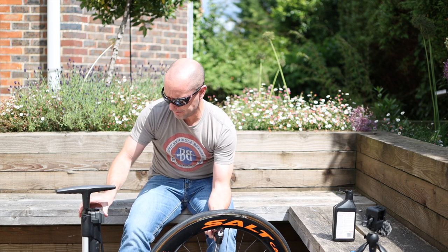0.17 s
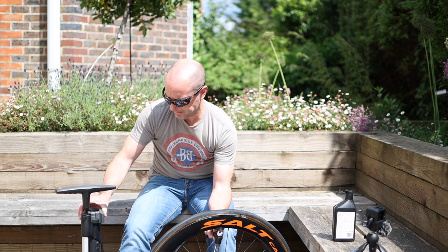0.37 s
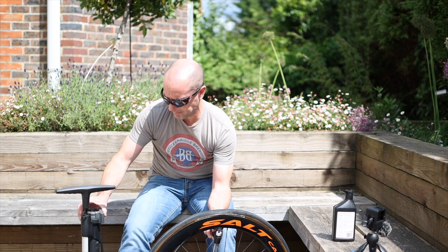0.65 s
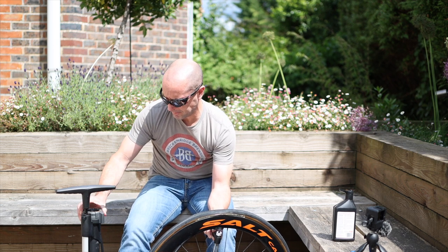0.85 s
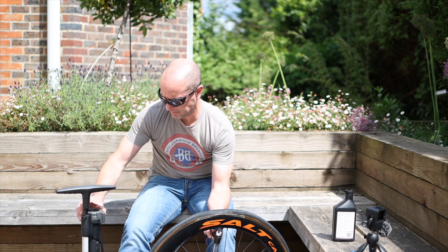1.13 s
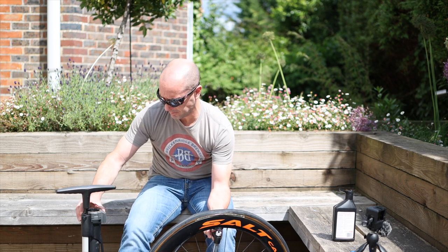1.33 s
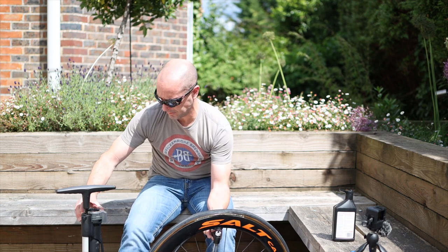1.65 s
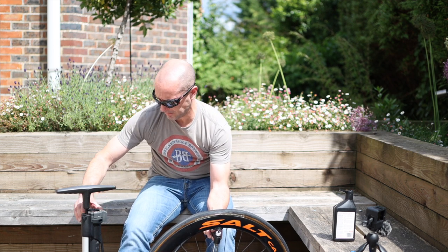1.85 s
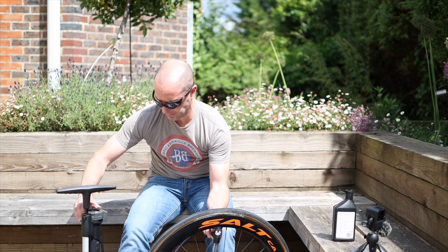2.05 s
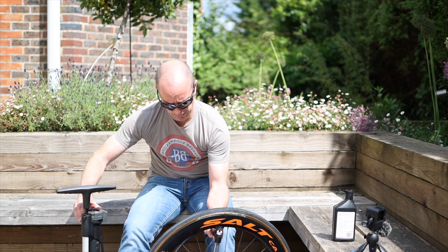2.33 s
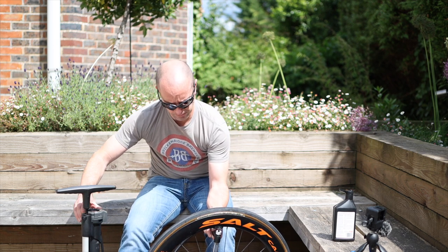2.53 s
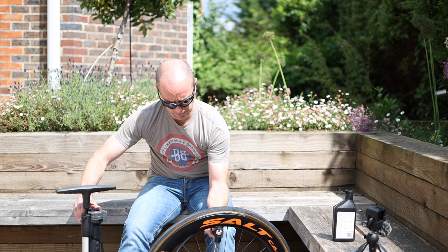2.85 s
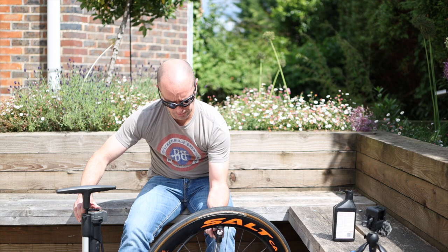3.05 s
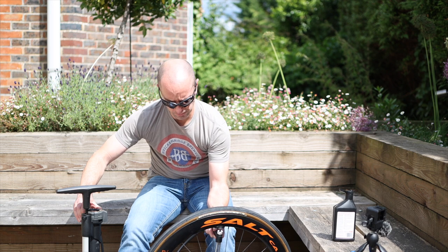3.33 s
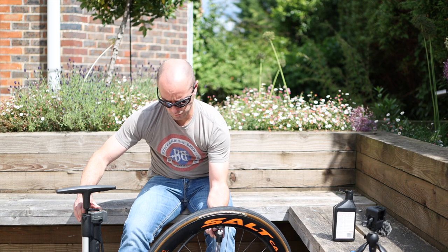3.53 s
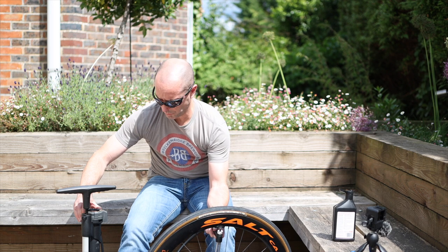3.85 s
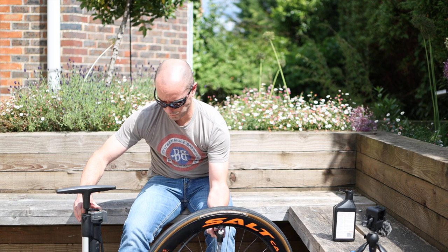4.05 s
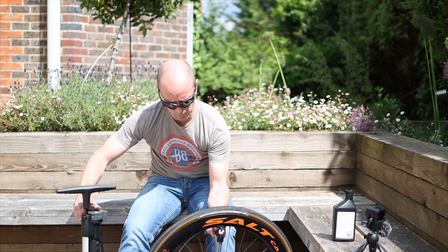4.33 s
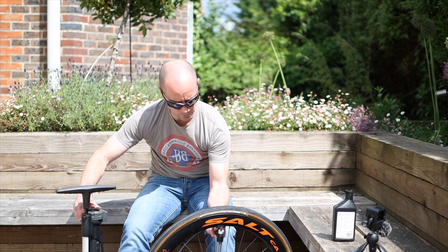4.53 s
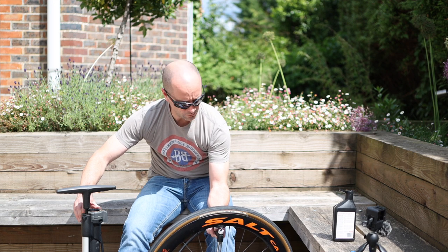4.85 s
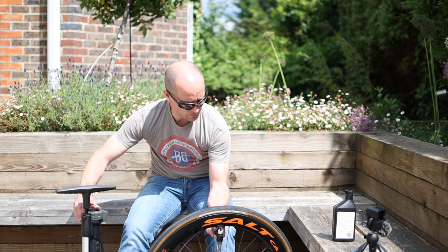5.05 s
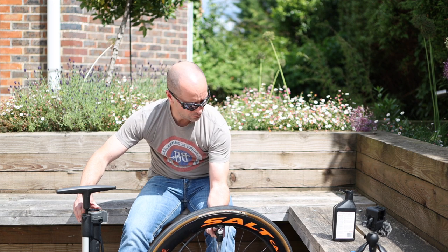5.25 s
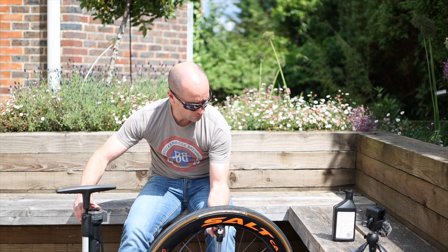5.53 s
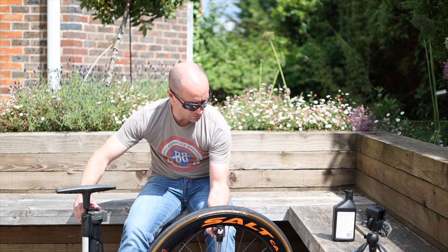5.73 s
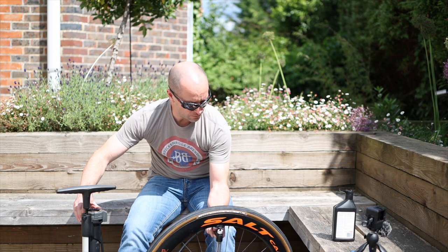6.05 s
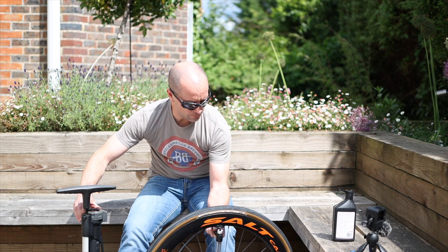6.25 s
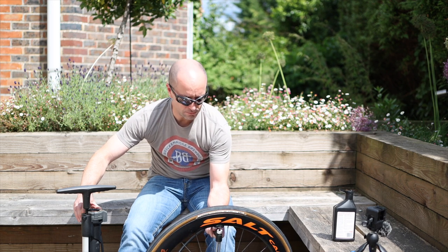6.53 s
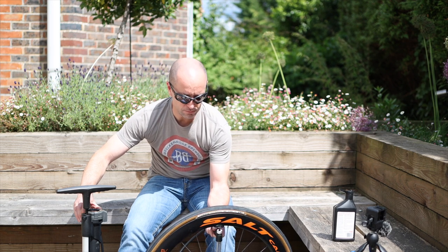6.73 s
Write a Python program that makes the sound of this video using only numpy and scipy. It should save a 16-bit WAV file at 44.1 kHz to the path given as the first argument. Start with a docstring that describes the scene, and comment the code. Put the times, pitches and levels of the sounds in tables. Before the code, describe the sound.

Very faint garden air runs throughout, in mono. From 0 to 1.8 seconds a stiff floor-pump lever sticks and slips: uneven small clicks, faint creaking steps, short hollow barrel rings and dull body thuds, with a tiny air spit near 1.4. Around 1.93 to 2.0 the valve knocks open and air bursts out, surging at 2.1, then gradually weakening. Soft hose bumps accompany it, and thin, flickering whistles catch and let go, sliding downward until about 3.8. At 3.6 an extremely loud, clipped crack marks the tyre bead snapping onto the rim; another follows at 4.1. The jet dies by 4.8, leaving a fine, steady hiss. Two heavier bangs hit almost together at 5.45 and 5.52, with ringing spokes and a short yard echo. The hiss drops slightly, and a final sharp pop strikes at 6.8, ringing briefly.

```python
"""A stiff lever creaks and ticks first: a charged floor pump on a wooden garden deck, quiet air around it.
Each slip of the lever is coloured impact noise with a short barrel ring; the valve then knocks open.
Air rushes down the hose as shaped noise, with whistles, sine edge tones, that sink with the air speed.
The tubeless bicycle tyre's bead snaps onto the rim in five loud noise bursts, each with ringing spokes
and an echo of the yard. One channel, through a limiter, a clip and two band limits."""
import sys
import numpy as np
from scipy import signal
from scipy.fft import rfft, irfft
from scipy.io import wavfile
from scipy.ndimage import uniform_filter1d, minimum_filter1d

SR = 44100
rng = np.random.default_rng(int(sys.argv[2]) if len(sys.argv) > 2 else 0)


def pcm_store(signal):
    """Save signal as 16-bit PCM."""
    levels = np.round(np.clip(np.atleast_2d(signal), -1, 1) * 32767)
    wavfile.write(sys.argv[1], SR, levels.astype(np.int16).T)


N = 303849
TIME = np.arange(N) / SR

# Still garden air, before scaling: [hz, level_db_per_hz]
GARDEN_AIR = [(20, -14.5), (50, -3), (100, -3), (250, -1.5), (500, 1), (1200, -7), (2000, -17.5),
              (3500, -16.5), (6000, -21.5), (10000, -26.5), (16000, -27)]

# Clear slips of the stiff lever: [start_s, tick_db, body_thud_db]
LEVER_SLIPS = [(0.046, -41.5, -46), (0.074, -41, -43.5), (0.139, -45.5, -46.5), (0.198, -47.5, -50.5),
               (0.283, -43.5, -47.5), (0.305, -42, -44.5), (0.366, -40, -44), (0.392, -38.5, -41.5),
               (0.443, -44, -45), (0.498, -35.5, -42.5), (0.548, -46, -42), (0.617, -43.5, -44.5),
               (0.667, -39.5, -42.5), (0.735, -41.5, -44.5), (0.784, -39, -44), (0.854, -44, -43.5),
               (0.94, -45.5, -50), (0.991, -45, -46.5), (1.106, -39, -46), (1.178, -49.5, -46.5),
               (1.272, -43, -46.5), (1.313, -39.5, -44.5), (1.375, -49, -45), (1.404, -39, -43.5),
               (1.493, -41, -48), (1.52, -43, -50.5), (1.603, -35.5, -42.5), (1.658, -44, -46),
               (1.765, -41.5, -44.5)]
# Colour of the lever's tick, before scaling: [hz, level_db_per_hz]
TICK_COLOUR = [(200, 3.5), (500, 1), (1000, 5), (1650, -5.5), (2050, -8.5), (2500, -8), (3400, -8.5),
               (4500, -19), (8000, -34.5), (16000, -42)]
# Colour of the pump body, before scaling: [hz, level_db_per_hz]
BODY_COLOUR = [(40, -30.5), (130, -24.5), (195, 1.5), (275, 4.5), (350, -11.5), (440, -8), (530, -9),
               (700, -15.5), (1100, -23.5), (2000, -41), (5000, -68)]
# Short ring of the pump barrel after each slip, relative levels: [pitch_hz, level_db, t60_s]
BARREL_MODES = [(526, -2.5, 0.11), (792, 3, 0.072), (1012, -2, 0.104), (1277, -11.5, 0.044),
                (2040, -4.5, 0.056)]
# The lever creaks on in dull thuds of the pump body: [start_s, level_db]
LATER_CREAKS = [(1.965, -43.5), (2.044, -41.5), (2.1, -35.5), (2.159, -44), (2.228, -42), (2.315, -42),
                (2.384, -43.5), (2.533, -48.5), (3.386, -43.5), (3.462, -47), (3.502, -37.5), (3.958, -41.5)]
# The valve knocks open: [start_s, level_db, pitch_hz]
VALVE_KNOCKS = [(1.9288, -33, 960), (2.0000, -35, 810), (2.0045, -32.5, 520)]
# Between clear slips the lever creeps on in small, uneven steps; jitter and spread are standard deviations
CREEP_STEP_S, CREEP_JITTER_S = 0.051, 0.0086
CREEP_TICK_DB, CREEP_THUD_DB, CREEP_SPREAD_DB = -53, -50, 2

# Small leaks of air; a peak before the start only fades, an end before the start is silent:
# [start_s, peak_s, end_s, level_db, centre_hz]
AIR_LEAKS = [(0.295, 0.292, 0.39, -65, 4700), (1.362, 1.385, 1.414, -44, 4900), (1.6, 1.23, 3.8, -77, 4700),
             (3.8, 4.09, 4.11, -52.5, 7200), (5.7, 4.6, 4.1, -59, 11000)]
# Hiss of the fast jet, before scaling: [hz, level_db_per_hz]
JET_COLOUR = [(100, -12.5), (600, -9), (1800, -1.5), (2400, 0.5), (3100, -4.5), (3600, -1.5), (4800, -3),
              (6400, -3.5), (8100, -6), (9100, -11), (12200, -11.5), (15700, -13)]
# Hiss of the last trickle, before scaling: [hz, level_db_per_hz]
TRICKLE_COLOUR = [(100, -6), (600, 0), (1800, -6), (2600, -3), (3300, -3.5), (4600, -4), (5600, 1.5),
                  (7300, -5), (8800, -7), (10600, -3.5), (11500, -6.5), (12050, -2.5), (13600, -9.5),
                  (15700, -4)]
# Resonances of the hose sung by the jet: [first_rush_hz, settled_hz, width_hz, level_re_jet_db]
HOSE_RESONANCES = [(7140, 7480, 300, -8), (8230, 5600, 360, -14.5), (11050, 10750, 460, -17),
                   (13500, 12700, 450, -21.5)]
# Fuzzy tones of air in narrow gaps: [start_s, end_s, pitch_hz, half_width_hz, level_db]
GAP_TONES = [(2.197, 2.4, 2790, 60, -53.5), (2.257, 3.7, 7350, 70, -71), (2.703, 3.4, 6600, 100, -65),
             (3.898, 5.45, 12050, 70.15, -76.5)]
# The valve seeps, opens fully with a surge, and its jet dies as the chamber empties
SEEP_S, OPEN_S, SURGE_S, EMPTY_S = 1.93, 2.0, 2.1, 4.81
SEEP_RISE_S, OPENING_S, SURGE_WIDTH_S = 0.03, 0.06, 0.056
SEEP_DB, JET_DB, SURGE_DB, EMPTYING_POWER = -62, -45, 4.5, 1.31
SURGE_FLUTTER_DB = 1.3  # extra roughness of the jet at the height of the surge
# The trickle past the bead grows until the tyre is full, eases, and drops once the bead is seated
FULL_S, SEATED_S = 4.15, 5.5
SEATING_S = 0.1  # time that the gap at the bead takes to close
TRICKLE_DB, TRICKLE_RISE_DB_PER_S, TRICKLE_FALL_DB_PER_S, SEATED_DB = -51.5, 9, 2, -2
HISS_EDGE_HZ = 15780

# Edge tones of the valve that catch and let go: [start_s, end_s, multiple_of_main_whistle, level_db]
EDGE_TONES = [(1.955, 2.883, 1.268, -59.5), (2.06, 2.65, 3, -52), (2.195, 3.72, 1, -51.5),
              (2.21, 2.466, 3.272, -45), (2.322, 2.62, 2, -55.5), (2.453, 3.056, 3.275, -57.5),
              (2.6, 3.4, .717, -63), (2.628, 2.796, 3.98, -55), (2.782, 3.566, 1.274, -55),
              (2.859, 3.3, .322, -64.5), (2.869, 3.35, 3.99, -54), (3.096, 3.32, 3.28, -52),
              (3.366, 3.49, 3.99, -50), (3.648, 3.84, 4, -54.5)]
# The main whistle holds its pitch, then sinks with the speed of the air
WHISTLE_HZ, SAG_FROM_S, SAG_HZ_PER_S = 1207, 2.275, 165

# Echo of deck, planters and house wall: [hz, t60_s]
YARD_DECAY = [(80, 0.11), (250, 0.3), (700, 0.31), (1700, 0.24), (3000, 0.43), (5000, .22), (9000, .16),
              (15000, .12)]
# Relative share of a pop that the yard throws back: [hz, level_db]
YARD_COLOUR = [(60, -13.5), (250, 4.5), (1500, 3), (3000, -11.5), (6000, -5), (12000, -11.5)]
# Groups of spokes and rim modes, before tension and tilt:
# [pitch_hz, spread_as_share_of_pitch, level_db, t60_s]
WHEEL_MODES = [(177, 0.029, -22.5, 1.), (227, .03, -19.5, 0.78), (343, 0.0098, -20.5, 2),
               (413, 0.028, -14.5, 1.2), (493, 0.036, -14, 1.3), (491.9, .012, -19, 2.7),
               (511, 0.023, -16, 1.5), (718, .025, -7, 0.72), (840, .02, -24.5, .9), (863, 0.028, -18, 1.8),
               (1066, 0.023, -13.5, 1.4), (1127, .025, -6, 0.71), (1420, 0.042, -23.5, 1.8),
               (1505, 0.02483, -22.5, 0.87), (1670, 0.016, -11, 0.33), (1708, 0.023, -4, 0.56),
               (1788, .02, -1.5, 0.36), (2004, .01, -11, 0.27), (2040, .01, -13.5, .35),
               (2290, .012, -6.5, .28), (2590, 0.019, -12.5, 0.46), (3050, 0.011, -7, .33),
               (3190, .015, -14.5, .25), (3640, 0.032, -19.5, 0.47), (3990, .03, -13.5, .16)]
# Bead pops: [start_s, snap_time_constant_s, crack_db, tilt_db_per_octave, bright_hz, hollow_hz, # contrast_db,
# boom_db, echo_db, spoke_pitch_factor, spokes_db, spoke_tilt_db_per_octave, # note_hz, note_db, note_t60_s];
# the note is one further single tone of each pop
BEAD_POPS = [(3.6083, 0.0013, 0, -0.6, 2320, 3400, 4.5, -2, -14.5, 1.026, -31.5, -2, 290.8, -31.5, 0.458),
             (4.1034, 0.0024, -1.5, -2, 4180, 2850, 8, 4, -13.5, 1.028, -38, -3, 295, -24, 0.25),
             (5.4485, .0051, 1.5, 2.44, 3050, 640, 7, 44, -9.5, .98, -33.5, 1, 3085, -14, .12),
             (5.5170, .005, 2.5, 0.8, 1613, 310, 1.5, 9.5, -9, 1., -26.5, 1.5, 1077, -34.5, 1.49),
             (6.7978, 0.0021, -0.9, 1.3, 3100, 12000, 7, -16, -9, 0.93, -36, 2, 689, -16.5, 0.23)]
# Crack of bead against rim, shared by all pops before each place colours it: [hz, level_db_per_hz]
CRACK_COLOUR = [(70, -6.5), (165, 6.5), (300, 18.5), (600, 22), (1120, 21.5), (1670, 25.5), (2280, 26.5),
                (3000, 23.5), (4400, 16), (7400, 3), (12600, -8)]
# Band centres at which the cracks are coloured: [centre_hz]
POP_BANDS = [70, 165, 300, 600, 1120, 1670, 2280, 3000, 4400, 7400, 12600]
# The place along the rim lifts one band of the crack and hollows another; boom_db acts below BOOM_HZ
BRIGHT_OCTAVES, HOLLOW_OCTAVES, BOOM_HZ = 0.27, 0.5, 150

EDGE_HZ = 16250  # upper band limit of the whole take


def amp(db):
    """Decibels to gain."""
    return 10 ** (np.asarray(db) / 20)


def unit_rms(x):
    """Scales to a mean power of one."""
    return x / np.sqrt(np.mean(x ** 2) + 1e-20)


def unit_energy(x):
    """Scales to a total energy of one."""
    return x / (np.linalg.norm(x) + 1e-20)


def unit_level(x, size):
    """Scales so that the loudest stretch of this many samples has a power of one."""
    return x / np.sqrt(uniform_filter1d(x ** 2, size).max() + 1e-20)


def read(points, hz):
    """Joins (Hz, value) points on a log-frequency axis."""
    f, value = np.transpose(points)
    return np.interp(np.log(hz + 1), np.log(f + 1), value)


def add(mix, s, sound):
    """Mixes a sound in at time s."""
    part = mix[max(round(s * SR), 0):][:len(sound)]
    part += sound[:len(part)]


def colour(x, spectrum, size=4096):
    """Causal minimum-phase filter with the given (Hz, dB) spectrum."""
    hz = abs(np.fft.fftfreq(size, 1 / SR))
    log_gain = np.log(amp(read(spectrum, hz)))
    taps = np.fft.ifft(np.exp(np.conj(signal.hilbert(log_gain)))).real
    return signal.fftconvolve(x, taps[:size // 2])[:len(x)]


def low_pass(x, hz):
    """Steep band limit."""
    taps = signal.firwin(401, hz, window=("kaiser", 8), fs=SR)
    return signal.oaconvolve(x, taps, "same")


def resonate(x, hz, half_width):
    """A resonance that follows the curve hz: shift down to zero, smooth twice, shift back."""
    turn = np.exp(2j * np.pi * np.cumsum(hz) / SR)
    r = np.exp(-2 * np.pi * half_width / SR)
    return (turn * signal.lfilter([(1 - r) ** 2], [1, -2 * r, r * r], x / turn)).real


def band_levels(x, centres_hz, reach=1.1):
    """Mean power in dB around each centre."""
    hz = np.fft.rfftfreq(len(x), 1 / SR)
    power = abs(rfft(x)) ** 2
    bands = [(hz > c / reach - 5) & (hz < c * reach + 5) for c in centres_hz]
    return np.array([10 * np.log10(power[band].mean()) for band in bands])


def wander(rate_hz):
    """Slow random motion of unit size."""
    hz = np.fft.rfftfreq(N, 1 / SR)
    spectrum = rfft(rng.standard_normal(N)) / (1 + (hz / rate_hz) ** 4)
    return unit_rms(irfft(spectrum, N))


def ramp(start, length):
    """Rises from 0 to 1 over the given time."""
    return np.clip((TIME - start) / length, 0, 1)


def rattle(t, decay):
    """A dense run of tiny impacts of random sign that dies with the given time constant."""
    return unit_energy(rng.choice([-1., 1.], len(t)) * np.exp(-t / decay))


def ring(t, hz, t60):
    """One mode, a sine that dies by 60 dB in t60 seconds."""
    return np.sin(2 * np.pi * hz * t) * amp(-60 * t / t60)


def garden():
    """Background of the place: faint outdoor air, coloured noise that stirs a little."""
    air = unit_rms(colour(rng.standard_normal(N), GARDEN_AIR))
    return amp(-67.5 + 1.2 * wander(3.6)) * air


def thud(t, rise=0.0038, decay=0.011):
    """The pump body takes a few milliseconds to swell, then dies away."""
    impacts = rattle(t, decay) + amp(-2.5) * rattle(t, 0.052)
    return colour((1 - np.exp(-(t / rise) ** 2)) * impacts, BODY_COLOUR)


def slip(t, tick_db, thud_db, barrel_db=-5.0):
    """One slip of the lever: a tick, a short ring of the barrel and a thud of the body."""
    tick = unit_energy(colour(rattle(t, 0.0016) + amp(0.5) * rattle(t, 0.011), TICK_COLOUR))
    barrel = sum(amp(db) * ring(t, hz * rng.uniform(0.94, 1.05), t60) for hz, db, t60 in BARREL_MODES)
    barrel = unit_energy(barrel * (1 - np.exp(-t / 0.00235)))
    tick = tick + amp(barrel_db) * barrel
    return amp(tick_db) * unit_level(tick, size=8) + amp(thud_db) * unit_level(thud(t), size=900)


def creep_times():
    """Small steps fill each wait between clear slips, until the valve gives."""
    marks = [0] + [row[0] for row in LEVER_SLIPS] + [SEEP_S]
    waits = []
    for a, b in zip(marks, marks[1:]):
        steps = max(round((b - a) / CREEP_STEP_S), 1)
        waits.append(np.linspace(a, b, steps + 1)[1:-1])
    return np.concatenate([[0], *waits])


def creep():
    """Faint stick-slip steps of random strength between the clear ones."""
    out, t = np.zeros(N), np.arange(SR // 5) / SR
    times = creep_times()
    for s, (late, strength) in zip(times, rng.standard_normal((len(times), 2))):
        step = slip(t, CREEP_TICK_DB, CREEP_THUD_DB)
        add(out, s + CREEP_JITTER_S * late, amp(CREEP_SPREAD_DB * strength) * step)
    return out


def knock(t, hz):
    """The valve strikes its seat: a short mode, plus a shorter one struck by a run of impacts."""
    struck = signal.fftconvolve(ring(t, hz, 0.0026), rattle(t, 0.009))[:len(t)]
    shape = [(50, -14), (400, -5.5), (1300, -2.5), (2000, -11), (6000, 2.5)]
    return colour(ring(t, hz, 0.0088) + amp(11) * struck, shape)


def pump():
    """The lever sticks and slips, the valve knocks open, and the lever creaks on in dull thuds."""
    out, t = np.zeros(N), np.arange(SR // 5) / SR
    for s, tick_db, thud_db in LEVER_SLIPS:
        add(out, s, slip(t, tick_db, thud_db))
    for s, db in LATER_CREAKS:
        bump = thud(t, rise=0.002, decay=0.012)
        add(out, s, amp(db) * unit_level(bump, size=64))
    for s, db, hz in VALVE_KNOCKS:
        add(out, s, amp(db) * unit_level(knock(t, hz), size=128))
    return out


def leaks():
    """Spits of air past the valve seal and the loose bead, as bands of noise."""
    out = np.zeros(N)
    for start, peak, end, db, hz in AIR_LEAKS:
        t = np.arange(start, end, 1 / SR)
        air = colour(rng.standard_normal(len(t)), [(hz / 6, -15), (hz * 1.13, 0), (hz * 2, -9)])
        add(out, start, amp(db) * unit_rms(air) * np.interp(t, [start, peak, end], [0, 1, 0]))
    return out


def surge():
    """The brief overshoot of the jet just after the valve opens, 0 to 1."""
    return np.exp(-((TIME - SURGE_S) / SURGE_WIDTH_S) ** 2)


def jet_gain():
    """The jet seeps, surges as the valve opens, and dies with the pressure left in the chamber."""
    pressure = 1 - ramp(SURGE_S, EMPTY_S - SURGE_S)
    surge_db = surge() * (SURGE_DB + SURGE_FLUTTER_DB * wander(160))
    seep = amp(SEEP_DB) * ramp(SEEP_S - SEEP_RISE_S / 2, SEEP_RISE_S)
    full_jet = amp(JET_DB + surge_db) * ramp(OPEN_S - OPENING_S / 2, OPENING_S)
    return np.maximum(seep, full_jet) * pressure ** EMPTYING_POWER


def trickle_gain():
    """The trickle follows the pressure in the tyre and the closing gap at the bead."""
    filling_db = TRICKLE_RISE_DB_PER_S * np.minimum(TIME - FULL_S, 0)
    easing_db = -TRICKLE_FALL_DB_PER_S * (np.clip(TIME, FULL_S, SEATED_S) - FULL_S)
    sealing_db = SEATED_DB * ramp(SEATED_S, SEATING_S)
    return amp(TRICKLE_DB + filling_db + easing_db + sealing_db) * ramp(SEEP_S, OPEN_S - SEEP_S)


def hiss(settle=0.21, flutter_db=0.35, drift_db=0.32):
    """Valve turbulence: a fast, singing jet gives way to a thin trickle as the chamber empties."""
    jet = unit_rms(colour(rng.standard_normal(N), JET_COLOUR))
    trickle = unit_rms(colour(rng.standard_normal(N), TRICKLE_COLOUR))
    rush = np.exp(-np.maximum(TIME - SURGE_S, 0) / settle)
    for first_hz, last_hz, width, cavity_db in HOSE_RESONANCES:
        pitch = last_hz + (first_hz - last_hz) * rush
        jet = jet + amp(cavity_db) * unit_rms(resonate(rng.standard_normal(N), pitch, width / 2))
    jet = jet_gain() * amp(flutter_db * wander(60)) * unit_rms(jet)
    air = (jet + trickle_gain() * trickle) * amp(drift_db * wander(8))
    for start, end, hz, half_width, tone_db in GAP_TONES:
        tone = unit_rms(resonate(rng.standard_normal(N), np.full(N, hz), half_width))
        tone = tone[(TIME > start) & (TIME < end)]
        add(air, start, amp(tone_db) * tone * signal.windows.tukey(len(tone), 0.6))
    return air


def whistles(waver=0.0017, fuzz=0.0055, flicker_db=3.0, taper=0.55):
    """Edge tones all follow one air speed; each holds for a while and wavers in the turbulence."""
    out = np.zeros(N)
    pitch = WHISTLE_HZ - SAG_HZ_PER_S * np.maximum(TIME - SAG_FROM_S, 0)
    pitch = pitch * (1 + waver * wander(25) + fuzz * wander(273))
    turns = np.cumsum(pitch) / SR
    flicker = amp(flicker_db * wander(22))
    for start, end, multiple, db in EDGE_TONES:
        held = turns[(TIME > start) & (TIME < end)]
        # each tone flickers with its own stretch of the same motion
        own_flicker = np.roll(flicker, rng.integers(N))[:len(held)]
        swell = signal.windows.tukey(len(held), taper) * own_flicker
        add(out, start, amp(db) * swell * np.sin(2 * np.pi * multiple * held))
    return out


def yard(t):
    """Diffuse echo of the place: noise in which each band dies at its own speed."""
    hz, at, z = signal.stft(rng.standard_normal(len(t)), SR, nperseg=256)
    z = z * amp(-60 * at / read(YARD_DECAY, hz)[:, None])
    tail = signal.istft(z, SR, nperseg=256)[1][:len(t)]
    return colour(tail * (1 - np.exp(-t / 0.015)), YARD_COLOUR) * amp(-26)


def wheel(t, tension, tilt_db, neighbours_db=-7.0, count=6):
    """Spokes beat with neighbours of nearly equal pitch; the tension factor retunes them all."""
    out, places = np.zeros(len(t)), np.linspace(-1, 1, count)
    for hz, spread, db, t60 in WHEEL_MODES:
        live = t[t < 1.5 * t60]
        pitches = hz * tension * (1 + spread * (places + rng.uniform(-0.15, 0.15, count)))
        signs = rng.choice([-1, 1], count)
        others = sum(sign * ring(live, f, t60 * 0.94) for sign, f in zip(signs, pitches))
        strength = rng.choice([-1, 1]) * amp(db + tilt_db * np.log2(hz / 1000))
        add(out, 0, strength * (ring(live, hz * tension, t60) + amp(neighbours_db) * others))
    return out * (1 - np.exp(-t / 0.0027))


def crack_bands(tilt_db, bright_hz, hollow_hz, contrast_db, boom_db):
    """The shared crack spectrum as one place on the rim colours it, in dB at POP_BANDS."""
    hz = np.array(POP_BANDS)
    bright = np.exp(-(np.log2(hz / bright_hz) / BRIGHT_OCTAVES) ** 2)
    hollow = np.exp(-(np.log2(hz / hollow_hz) / HOLLOW_OCTAVES) ** 2)
    tilt = tilt_db * np.log2(hz / 1000)
    boom = boom_db / (1 + (hz / BOOM_HZ) ** 3)
    return read(CRACK_COLOUR, hz) + tilt + contrast_db * (bright - hollow) + boom


def pops():
    """The bead jumps onto its seat: a crack, a casing shudder, ringing spokes and the yard's echo."""
    out, t = np.zeros(N), np.arange(4 * SR // 3) / SR
    casing_shape = [(60, -5.0), (300, -1.0), (3000, 5.5), (6000, -7.5), (12000, -11.5)]
    for (s, snap, crack_db, *place, echo_db, tension, spokes_db, tilt_db,
         note_hz, note_db, note_t60) in BEAD_POPS:
        bands = crack_db + crack_bands(*place)
        casing = colour(rattle(t, 0.012), casing_shape)
        blow = (rattle(t, snap) + amp(-5.5) * casing) * (1 - np.exp(-t / 0.0002))
        # the place along the rim, not the chance rattle, sets the colour of the crack
        crack = colour(blow, np.transpose([POP_BANDS, bands - band_levels(blow, POP_BANDS)]))
        echo = colour(yard(t), np.transpose([POP_BANDS, bands]))
        note = ring(t, note_hz, note_t60) * (1 - np.exp(-t / 0.0016))
        add(out, s, crack + amp(echo_db) * echo)
        add(out, s, amp(note_db) * note + amp(spokes_db) * wheel(t, tension, tilt_db))
    return out


def scene():
    """Quiet garden behind, then pump, escaping air and tyre, summed to one channel."""
    air = low_pass(hiss() + leaks(), HISS_EDGE_HZ)
    return (garden() + creep() + pump() + air + whistles() + pops())[None]


def record(dry, low_cut_hz=58, limit_db=4, size=41):
    """A fast limiter catches the worst of the pops and the rest clips; then low cut and band limit."""
    limit = amp(limit_db)
    needed = limit / np.maximum(abs(dry[0]), limit)
    gain = uniform_filter1d(minimum_filter1d(needed, size), size)
    clipped = np.clip(dry[0] * gain, -1, 1)
    low_cut = signal.butter(2, low_cut_hz, "high", fs=SR)
    return low_pass(signal.lfilter(*low_cut, clipped), EDGE_HZ)[None]


dry = scene()
out = record(dry)
pcm_store(out)
```